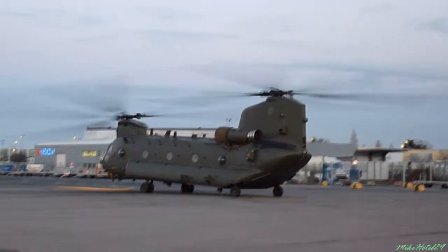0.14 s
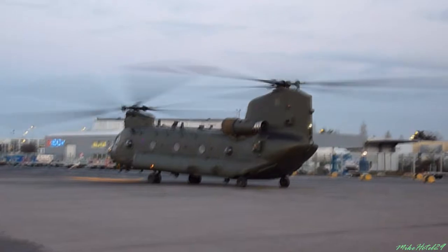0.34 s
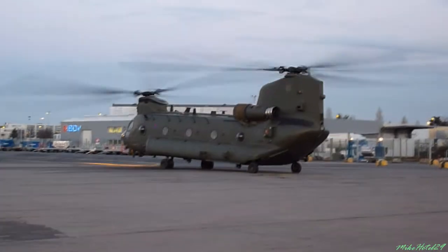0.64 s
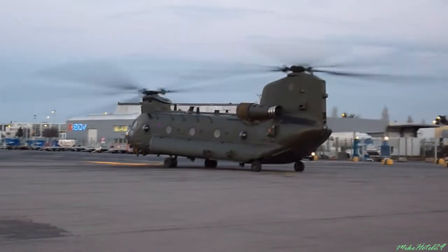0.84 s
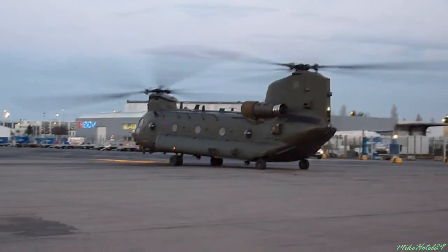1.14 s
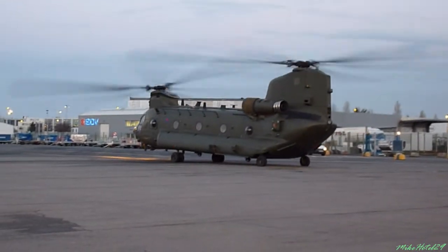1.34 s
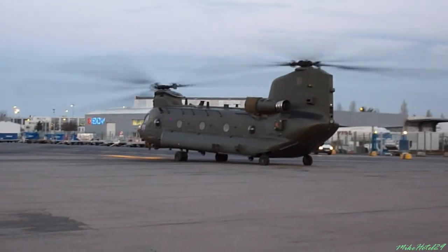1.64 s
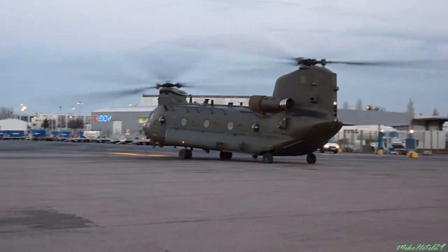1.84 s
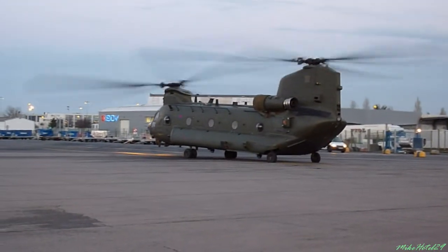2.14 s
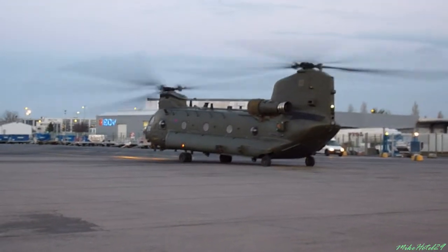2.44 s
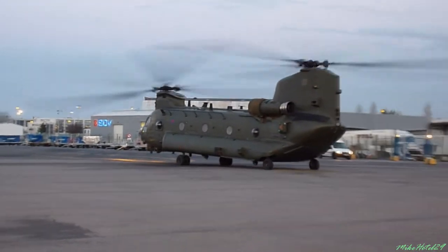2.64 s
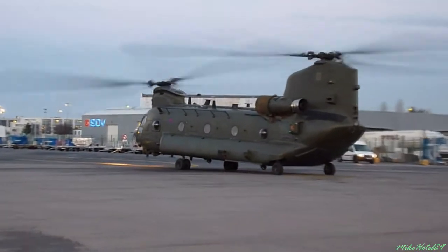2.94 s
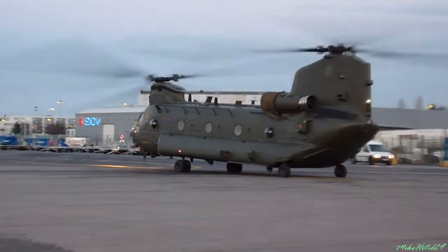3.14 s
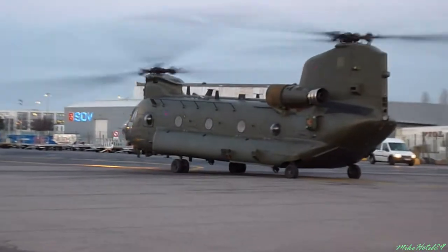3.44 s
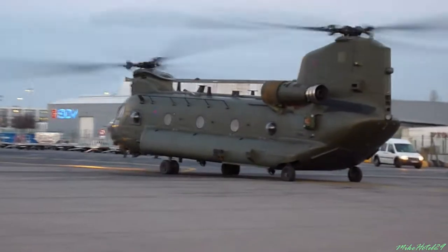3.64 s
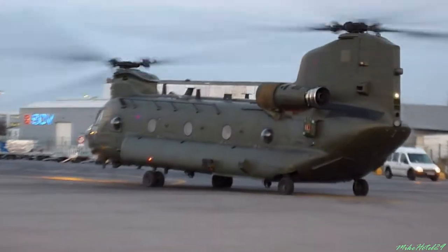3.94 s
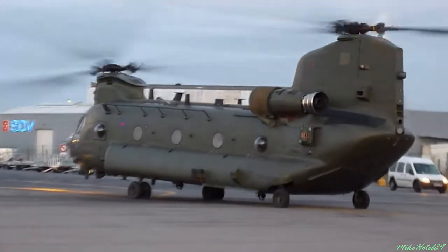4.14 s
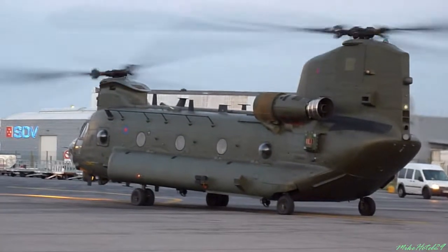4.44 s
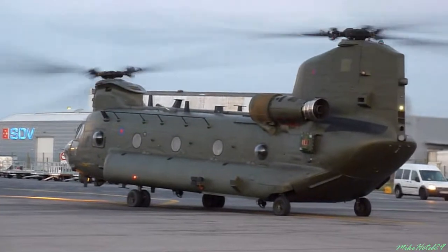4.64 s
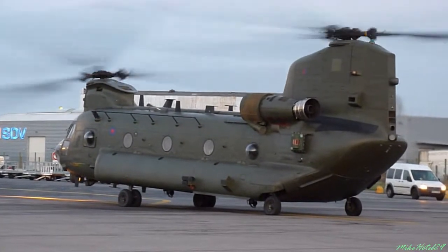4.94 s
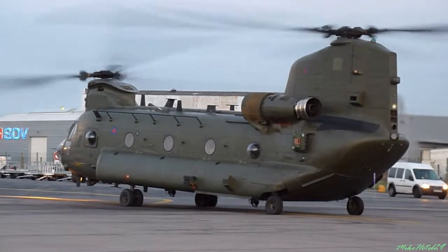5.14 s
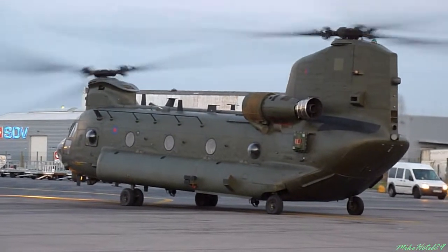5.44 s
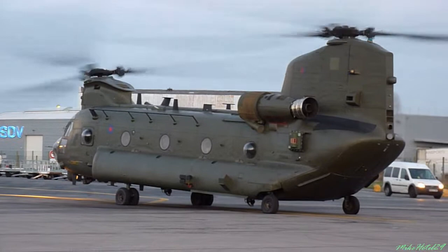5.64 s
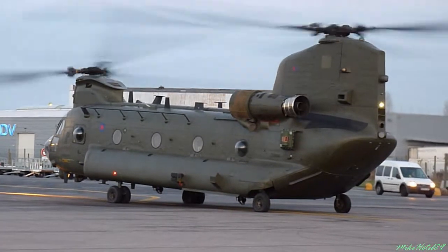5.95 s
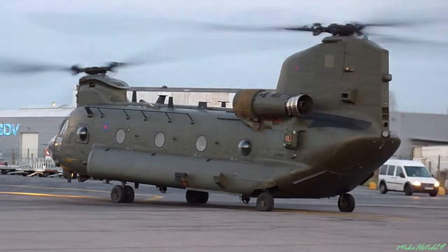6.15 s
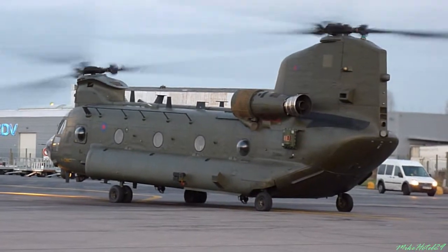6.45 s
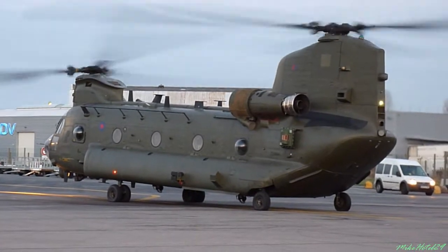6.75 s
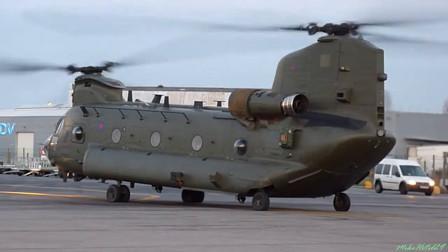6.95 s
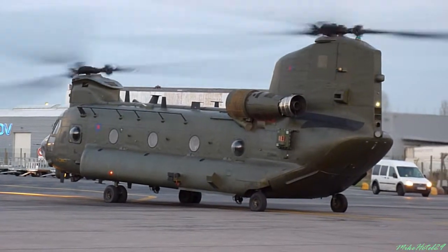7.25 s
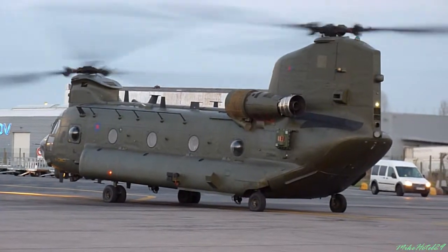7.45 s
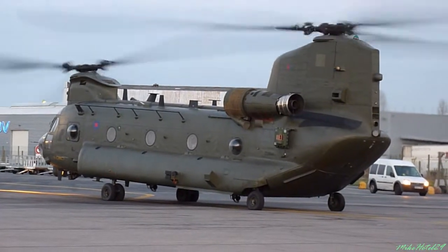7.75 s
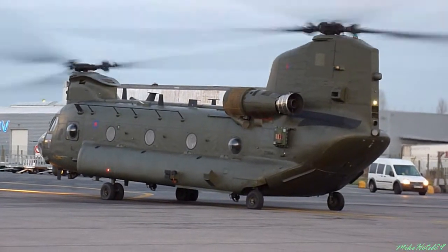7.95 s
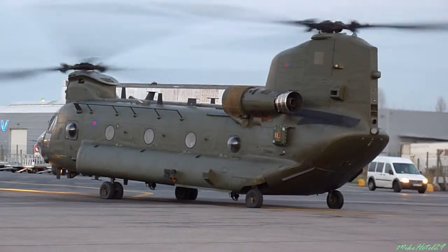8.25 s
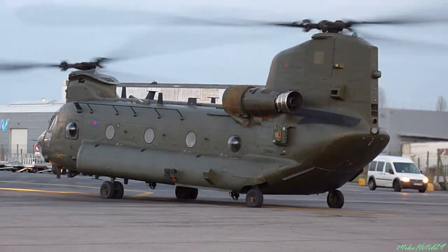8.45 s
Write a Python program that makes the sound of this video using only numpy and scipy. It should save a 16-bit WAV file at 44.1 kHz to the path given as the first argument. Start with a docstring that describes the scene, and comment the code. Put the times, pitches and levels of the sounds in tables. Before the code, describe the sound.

Continuous close helicopter noise outdoors on concrete: rapid interleaved rotor thuds, a short bright swish from the rear blades and a broader, duller beat from the front. Turbines roar beneath, with fluttering hiss and a thin steady whine above. Irregular knocks and chopping bursts roughen the rhythm, densest past the middle of the first half. A low hum dips twice, then peaks near seven seconds. Small camera microphone, narrow band, levels automatically evened.

```python
"""A twin-rotor helicopter taxis across a concrete apron, some tens of metres from a small narrow-band camera.
From the start two rotors pass in turn, eleven blades a second each: deep harmonics, pulses and gated noise.
Turbines roar, hiss and whine as noise and wavering tones; gearboxes sing faintly. Slaps, bursts of torn air,
come early and crowd together from 4 to 4.8 s, among dull chops and ringing knocks. Near 1.5 and 5.8 s the
drone of the fifth harmonic sinks away; it is strongest at 7 s, and a last run of slaps comes after 8.2 s."""
import sys
import numpy as np
from scipy import signal
from scipy.fft import rfft, irfft, next_fast_len
from scipy.io import wavfile
from scipy.ndimage import uniform_filter1d

SR = 44100
rng = np.random.default_rng(int(sys.argv[2]) if len(sys.argv) > 2 else 0)


def master_out(mix):
    """Clip the mix to full scale and print it as 16-bit PCM to the path in sys.argv[1]."""
    frames = np.transpose(np.atleast_2d(mix))
    ceiling = np.clip(frames, -1, 1)
    pcm = np.round(ceiling * 32767).astype(np.int16)
    wavfile.write(sys.argv[1], SR, pcm)


N = 379260
TIME = np.arange(N) / SR
FIRST_PASS_S, PASS_S = .0497, .0889   # first rear blade pass; time from one pass to the next

# noise spectrum of the blades' thump: [f/Hz, relative level/dB]
THUMP_SPECTRUM = [(60, -28), (85, -21), (110, -18.5), (140, 4.5), (190, 1), (245, -2.5), (290, -22),
                  (450, -22.5)]
# noise spectrum of the chop from large eddies: [f/Hz, relative level/dB]
CHOP_SPECTRUM = [(200, -23), (320, 5.5), (450, -6.5), (750, 0), (1000, -17.5), (1700, -20.5)]
# noise spectrum of the swish from small eddies: [f/Hz, relative level/dB]
SWISH_SPECTRUM = [(600, -19.5), (1050, 5), (1500, 6.5), (1900, -1.5), (3000, 0), (4000, -6.5), (5000, -13),
                  (7000, -11), (8000, -19)]
# each sound comes from its own part of the blade's sweep, which shifts as the aircraft turns:
# [t/s, rear thump lateness/passes, rear swish lateness/passes, front swish lateness/passes]
BLADE_LATENESS = [(0, 0.084, 0.057, .03), (.6, 0.04, .02, 0.032), (2, 0.0079, 0.016, -0.012),
                  (3.1, -0.018, -.035, -0.02), (3.7, -0.015, 0.036, 0.008), (4.4, -0.019, 0.0037, 0.00086),
                  (4.8, -0.022, -.02, -0.07), (5.6, -0.048, -0.0012, -0.02), (7.1, -0.047, 0.02, -0.072),
                  (8.6, -0.076, -0.07, -.03)]


def from_db(db):
    """Decibels to gain."""
    return 10 ** (np.asarray(db) / 20)


def rms_one(x):
    """Scale to unit power."""
    return x / np.sqrt(np.mean(np.abs(x) ** 2) + 1e-20)


def in_time(rows):
    """The columns of a curve table at every sample."""
    s, *columns = np.transpose(rows)
    return [np.interp(TIME, s, column) for column in columns]


def at_hz(points, hz):
    """Gain of a spectrum table, joined on a log-frequency axis."""
    f, db = np.transpose(points)
    return from_db(np.interp(np.log(hz), np.log(f), db))


def band_pass(x, low_hz, high_hz):
    """Keep one band with gentle skirts."""
    return signal.sosfilt(signal.butter(2, [low_hz, high_hz], "band", fs=SR, output="sos"), x)


def boost(x, hz, width_hz, gain):
    """A resonance brings the band round hz to the given gain and leaves the rest alone."""
    return x + (gain - 1) * signal.lfilter(*signal.iirpeak(hz, hz / width_hz, fs=SR), x)


def drift(rate_hz):
    """Smooth random wander with spread 1: noise through two equal low-pass poles, made every 40 samples."""
    step = 40
    pole = np.exp(-2 * np.pi * rate_hz * step / SR)
    settling = 2000
    noise = rng.standard_normal(N // step + settling + 2)
    slow = signal.lfilter([1], [1, -2 * pole, pole * pole], noise)[settling:]
    return np.interp(np.arange(N) / step, np.arange(len(slow)), rms_one(slow))


def wavering_tone(hz, spread_hz):
    """A tone scattered by moving air into a narrow band; rms 1."""
    turn = 2 * np.pi * np.cumsum(hz * np.ones(N)) / SR
    return drift(spread_hz) * np.cos(turn) + drift(spread_hz) * np.sin(turn)


def turbulence(spectrum, memory=0, memory_hz=300):
    """Stereo noise, rms 1; large eddies outlive a blade pass, so lows partly repeat where memory is set."""
    # stereo width: [f/Hz, side against mid/dB]
    stereo_width = [(50, -23.5), (140, -32), (250, -28.5), (500, -27.5), (1000, -22), (2000, -11.5),
                    (4000, -9), (7000, -2.5)]
    size = next_fast_len(N)
    hz = np.maximum(np.arange(size // 2 + 1) * SR / size, 1)
    lowest_hz, highest_hz = spectrum[0][0], spectrum[-1][0]
    skirts = 1 / (1 + (hz / (2 * highest_hz)) ** 4) / (1 + (lowest_hz / (2 * hz)) ** 4)
    kept = np.clip(memory, 0, .9) / (1 + (hz / memory_hz) ** 4)
    repeats = np.sqrt(1 - kept ** 2) / (1 - kept * np.exp(-2j * np.pi * hz * PASS_S))
    mid, side = rfft(rng.standard_normal((2, size))) * at_hz(spectrum, hz) * skirts * repeats
    side = side * at_hz(stereo_width, hz)
    return rms_one(irfft(np.array([mid + side, mid - side]), size)[:, :N])


def steady(x):
    """Even out the level over two blade passes; rms near 1."""
    power = uniform_filter1d(np.mean(x ** 2, axis=0), int(2 * PASS_S * SR))
    return x / np.sqrt(power + 1e-12)


def ground_echo(x, delay_s, wander_s, share):
    """The concrete returns a copy whose wandering delay, from blades and wind, recolours each beat."""
    late = TIME - delay_s - wander_s * drift(4.8)
    echo = np.array([np.interp(late, TIME, ear) for ear in x])
    return (x + share * echo) / np.hypot(1, share)


def blade_gate(passes, rise, fall):
    """Swell and decay around each blade pass; rise and fall are shares of one pass."""
    after = passes % 1
    return np.maximum(np.exp(-after / fall), np.exp(-((1 - after) / rise) ** 2))


def blade_pulses(passes, low_hz, high_hz, scatter_db):
    """One short pressure pulse per blade, each of its own strength; peak near 1."""
    clicks = np.diff(np.floor(passes), prepend=np.floor(passes[0]))
    pulses = band_pass(clicks + 1e-18, low_hz, high_hz)
    return pulses / np.abs(pulses).max() * from_db(scatter_db * drift(10.6))


def torn_air(spectrum, level_db, gate, crackle_db):
    """Gated noise: vortices break up unevenly along the blade and crackle, while the beats stay even."""
    uneven = drift(160)
    crackle = from_db(crackle_db * (uneven - uniform_filter1d(uneven, size=SR // 60)))
    return from_db(level_db) * gate * crackle * turbulence(spectrum)


def swell(s, swell_s):
    """The samples that a blow near s covers, and its envelope: a quick swell to a peak just before s and a
    slower decay."""
    age = np.arange(SR // 12) / SR / swell_s   # in swell times; the envelope is 1 at one swell time and peaks a little earlier, at two thirds
    # the envelope sets out from zero one swell time ahead of s
    span = int((s - swell_s) * SR) + np.arange(len(age))
    # at the peak the rise and the decay balance only roughly
    return span, np.sqrt(age) * np.exp(.75 * (1 - age))


def torn_burst(s, db, swell_s, low_hz, high_hz):
    """A few milliseconds of torn air in one band; db is its level near the top of the swell."""
    out, (span, shape) = np.zeros(N), swell(s, swell_s)
    noise = band_pass(rng.standard_normal(2 * len(span)), low_hz, high_hz)
    settled = noise[len(span):]
    out[span] = from_db(db) * rms_one(shape * settled) * np.sqrt(np.mean(shape ** 2))
    return out


def gearboxes():
    """Meshing teeth sing faint tones, each smeared into a narrow band."""
    # gear mesh tones: [f/Hz, spread/Hz, level/dB]
    mesh_tones = [(1447, 11.5, -47), (1784, 3.4, -47)]
    return sum(from_db(db) * wavering_tone(hz, spread) for hz, spread, db in mesh_tones)


def beams():
    """Narrow sounds that leave the aircraft in one direction swell as they sweep past the microphone."""
    # tones and narrow noise as the aircraft turns: [t/s, half length/s, f/Hz, spread/Hz, level/dB]
    beam_table = [(2.1, 0.34, 1785, 5.3, -35), (3.7, 0.67, 436.6, 34, -36), (4.198, 0.54, 247.4, 20, -26.5),
                  (5.4, 0.97, 3800, 170, -37), (4.197, 0.55, 1530, 61, -45), (4.72, 0.14, 5830, 98, -42)]
    out = np.zeros(N)
    for s, length, hz, spread, db in beam_table:
        sweep = np.exp(-((TIME - s) / length) ** 2)
        out += from_db(db) * sweep * wavering_tone(hz, spread)
    return out


def turbines(passes):
    """Exhaust and downwash roar; intake hiss and compressor whine flutter in the air from the blades."""
    # exhaust and downwash spectrum: [f/Hz, relative level/dB]
    roar_spectrum = [(25, -30), (60, -5), (80, -14), (110, -5), (140, 4), (190, -5.5), (245, -3.5),
                     (290, -8.5), (500, -18), (760, -12), (1000, -17.5), (1500, -25), (2200, -27),
                     (5000, -40)]
    # intake spectrum: [f/Hz, relative level/dB]
    hiss_spectrum = [(1000, 1), (2200, 1.5), (3500, 4.5), (4500, -1.5), (5800, -3.5), (6900, -5),
                     (7500, -9.5), (8000, -16.5)]
    # intake hiss ahead of trim and flutter: [t/s, level/dB]
    hiss_level = [(0.0, -30.5), (0.3, -31), (1.5, -31), (1.6, -32), (4.6, -34), (4.7, -31.5), (4.9, -35.5),
                  (5.5, -31), (7.1, -32), (7.3, -30.5), (8.6, -34)]
    # compressor tone ahead of trim and flutter: [t/s, f/Hz, level/dB]
    whine_curve = [(0, 6509, -42), (1.4, 6503, -43), (2.4, 6486, -44), (3.3, 6468, -45), (4.5, 6470, -48),
                   (5.3, 6472, -47), (6, 6474, -44), (7.3, 6480, -45), (8.6, 6465, -44)]
    roar = from_db(-20.5) * steady(turbulence(roar_spectrum, memory=0.63, memory_hz=377))
    flutter = 1.063 + 0.47 * blade_gate(passes - .62, rise=0.14, fall=0.69)

    hiss_gain = from_db(in_time(hiss_level)[0] + 0.7 + 1.23 * drift(2.8))
    hiss = hiss_gain * ground_echo(turbulence(hiss_spectrum), delay_s=0.001408, wander_s=0.00011, share=0.21)

    whine_hz, whine_db = in_time(whine_curve)
    scattered = np.array([wavering_tone(whine_hz, spread_hz=39) for ear in range(2)])
    common = wavering_tone(whine_hz, spread_hz=40)
    whine = from_db(whine_db + 1.0) * rms_one(0.6 * scattered + common)
    to_the_right = from_db([[-.55], [.55]])   # hiss and whine sit a little to the right
    return roar + flutter * (hiss + whine) * to_the_right


def thrum(passes):
    """Low harmonics of the blade rate add up to one throb per pass; the fifth stands out as a drone."""
    # the low throb: [multiple of the blade rate, relative level/dB]
    harmonics = [(1, -18), (2, 4.5), (3, -2), (4, 7), (6, -7)]
    # low throb ahead of trim: [t/s, level/dB]
    throb_level = [(0.0, -30), (3.6, -35), (4.2, -30), (4.8, -40), (5.7, -36), (6.4, -36.5), (8.6, -35.0)]
    # drone at five times the blade rate, ahead of trim: [t/s, level/dB]
    drone_level = [(0.0, -28), (1.1, -29), (1.5, -45), (1.8, -27), (3.1, -27), (4.9, -26), (5.8, -53),
                   (6.3, -36), (7.0, -23), (8.6, -33)]
    lead = 0.16   # in passes: the low pressure wave leads the rear blade's swish
    turn = 2 * np.pi * (passes + lead)
    throb = rms_one(sum(from_db(db + .7 * drift(1.5)) * np.cos(round(k) * turn) for k, db in harmonics))
    throb_gain = from_db(in_time(throb_level)[0] - 1.5)
    drone_gain = from_db(in_time(drone_level)[0] - 3.5)
    return throb_gain * throb + drone_gain * np.cos(5 * turn)


def front_rotor(passes, ordinary):
    """These blades pass in between the rear ones, with a broader, duller beat."""
    # weight of the front thump: [t/s, relative level/dB]
    thump_weight = [(0.0, -2.5), (0.8, -9.5), (1.3, 0), (2.2, -0.5), (3.8, -3.5), (4.5, -2), (5.1, -2),
                    (6.4, -4.5), (6.9, 2.5), (7.7, -6.5), (8.6, -0.5)]
    # roughness of the air at the front blades: [t/s, relative chop level/dB, relative swish level/dB]
    wake_roughness = [(0.0, 0, -5), (0.5, -7.5, -15), (1.2, 0.5, 0.5), (2.0, 3.5, -4.5), (2.6, -1, 2.5),
                      (3.3, 0, 0), (3.5, 0, -9), (4.35, -1, -17), (4.55, -2, 2), (4.8, 3.5, 4.5),
                      (5.05, 0, 0.5), (5.9, -2, -2), (6.4, 2.5, -2), (7.25, -0.5, 1.5), (7.6, -8, -19),
                      (8.6, -6, -8)]
    thump_db = in_time(thump_weight)[0]
    chop_db, swish_db = in_time(wake_roughness)
    *_, swish_late = in_time(BLADE_LATENESS)

    body_noise = turbulence(THUMP_SPECTRUM, memory=0.8, memory_hz=363)
    body = from_db(-20) * steady(blade_gate(passes - .58, rise=0.16, fall=0.42) * body_noise)
    pulse = from_db(-13.5) * blade_pulses(passes - .52, low_hz=125, high_hz=229, scatter_db=2.5)

    chop_gate = blade_gate(passes - .57, rise=0.18, fall=0.4)
    chop = torn_air(CHOP_SPECTRUM, -23.5 + chop_db, chop_gate, crackle_db=2)
    swish_gate = blade_gate(passes - .6 - swish_late, rise=0.082, fall=0.25)
    swish = torn_air(SWISH_SPECTRUM, -27 + swish_db, swish_gate, crackle_db=2.8)
    rough_air = ground_echo(chop + swish, delay_s=0.001798, wander_s=0.000362, share=0.44)
    return ordinary * from_db(thump_db) * (body + pulse) + rough_air


def rear_rotor(passes, ordinary):
    """Blades working in the front rotor's wake: a short thump and a bright swish."""
    # weight of the rear thump: [t/s, relative level/dB]
    thump_weight = [(0.0, -15.5), (0.3, 5.5), (1.2, -6.5), (1.6, -1), (3.3, -9), (3.9, -3), (4.7, -2),
                    (5.0, 3.5), (6.2, 0.5), (7.3, -9.5), (8.0, 4.5), (8.6, -1)]
    # roughness of the air at the rear blades: [t/s, relative chop level/dB, relative swish level/dB]
    wake_roughness = [(0.0, -0.5, -2), (.7, 3.5, -3), (1.25, -0.5, -1), (1.7, -1, -1.5), (2.6, -1, -1.5),
                      (3.2, -2, -0.5), (3.7, -8, -1.5), (4.2, 7.5, 4.5), (4.7, -11, -1.5), (4.95, -15, -7),
                      (5.5, 3.5, -4), (6.1, -2.5, -0.5), (7.1, -1, -2), (7.3, 2.5, 2.5), (7.8, 2.5, -1),
                      (8.6, 1, 1.5)]
    thump_db = in_time(thump_weight)[0]
    chop_db, swish_db = in_time(wake_roughness)
    thump_late, swish_late, _ = in_time(BLADE_LATENESS)

    body_noise = turbulence(THUMP_SPECTRUM, memory=0.47, memory_hz=350)
    body = from_db(-26) * steady(blade_gate(passes - thump_late, rise=0.043, fall=0.2) * body_noise)
    pulse_passes = passes + 0.031 - thump_late
    pulse = -from_db(-16.5) * blade_pulses(pulse_passes, low_hz=121.0, high_hz=214, scatter_db=2.5)

    chop_gate = blade_gate(passes + 0.08, rise=0.11, fall=0.47)
    chop = torn_air(CHOP_SPECTRUM, -28.5 + chop_db, chop_gate, crackle_db=4.5)
    edge = blade_gate(passes - swish_late, rise=0.052, fall=0.076)
    wake = blade_gate(passes - swish_late, rise=0.12, fall=0.29)
    swish = torn_air(SWISH_SPECTRUM, -24 + swish_db, 0.51 * edge + .7 * wake, crackle_db=1.5)
    rough_air = ground_echo(chop + swish, delay_s=.0027, wander_s=0.000293, share=0.59)
    return ordinary * from_db(thump_db) * (body + pulse) + rough_air


def lobes(x):
    """Bands of the rotor and turbine sound swell or sink as the aircraft turns."""
    # bands beamed towards or past the microphone: [t/s, half length/s, f/Hz, width/Hz, change/dB]
    lobe_table = [(0.47, 0.32, 130, 32, 3.5), (.8, 1.0, 510, 70, 3.5), (3.45, 1.2, 416, 120, 3),
                  (5.7, 1.3, 196, 43, 1.5), (7.1, 1.4, 110, 32, -1), (3.8, 0.88, 960, 270, -1.5),
                  (3.5, .8, 96, 21, 6.5), (0.84, 0.51, 249, 50, -3), (.3, .9, 97, 22, -5)]
    for s, length, hz, width, db in lobe_table:
        x = boost(x, hz, width, from_db(db * np.exp(-((TIME - s) / length) ** 2)))
    return x


def chops(spread):
    """A blade tears through a patch of rough air with a dull, full burst, over an octave wide."""
    # chops: [t/s, level/dB, swell/s, centre f/Hz]
    chop_table = [(.76, -19, 0.0033, 785), (.958, -21, .003, 700), (1.335, -22.5, .005, 600),
                  (1.699, -23, 0.0033, 650), (1.874, -18.5, 0.0032, 650), (2.047, -16, 0.0054, 670),
                  (2.136, -17, 0.0013, 630), (2.761, -16.5, .003, 730), (3.21, -22, .004, 600),
                  (3.301, -20, .005, 730), (3.388, -15, 0.0035, 600), (3.571, -30, .005, 550),
                  (3.654, -19.5, .005, 486), (4.134, -13.5, 0.00217, 616), (4.311, -15, 0.0032, 530),
                  (4.812, -24, 0.0068, 570), (6.32, -26, .006, 680), (6.849, -23, 0.0034, 700),
                  (7.12, -19, .003, 535), (7.209, -17, 0.00457, 654)]
    return sum(torn_burst(s, db, swell_s, hz / (1 + spread), hz * (1 + spread))
               for s, db, swell_s, hz in chop_table)


def knocks():
    """Blades meet large eddies and ring for a few cycles; also returns the share of ordinary thump left."""
    # knocks ahead of the low cut: [t/s, level/dB, swell/s, ring f/Hz]
    knock_table = [(.242, -8.5, .005, 177), (.322, -9, .005, 152), (.499, -7.5, .003, 171),
                   (.588, -8.5, .0025, 159), (.677, -8, .0025, 179), (.863, -10, .003, 163),
                   (1.433, -9, .003, 176), (1.564, -6.5, .0025, 184), (2.365, -8, .005, 162),
                   (2.413, -6.5, .005, 176), (2.508, -7.5, .0025, 176), (2.699, -9, .0035, 210),
                   (2.786, -8.5, .0025, 171), (2.859, -7.5, .003, 162), (3.43, -8.5, .0025, 177),
                   (4.82, -8.5, .003, 170), (4.85, -7.5, .0025, 188), (4.939, -7.5, .003, 199),
                   (5.113, -6.5, .0035, 178), (5.204, -7.5, .003, 163), (5.291, -9, .005, 160),
                   (5.381, -7.5, .0025, 179), (5.619, -7.5, .004, 151), (5.823, -6.5, .004, 155),
                   (6.006, -9, .003, 172), (6.077, -8.5, .0025, 165), (6.585, -9, .003, 181),
                   (6.852, -7.5, .003, 189), (6.94, -9.5, .003, 198), (7.031, -8.5, .003, 199),
                   (7.307, -9.5, .004, 159), (7.386, -8.5, .0025, 199), (8.016, -8.5, .0025, 181)]
    out, ordinary = np.zeros(N), np.ones(N)
    for s, db, swell_s, hz in knock_table:
        span, shape = swell(s, swell_s)
        out[span] += from_db(db) * shape * np.cos(2 * np.pi * hz * (TIME[span] - s))
        ordinary[span] *= np.maximum(1 - shape, 0)
    return signal.sosfilt(signal.butter(2, 60, "high", fs=SR, output="sos"), out), ordinary


def slaps(low_hz, dull_hz, level_db):
    """Blades cut tip vortices in bright bursts of their own length; distance takes the snap off them."""
    # slaps ahead of trim and dulling: [t/s, level/dB, swell/s, top f/Hz]
    slap_table = [(.405, -22, 0.0038, 4200), (.495, -20, .004, 4600), (.585, -22, 0.0037, 4300),
                  (.674, -21.5, .003, 4400), (1.213, -25, 0.0036, 3000), (1.263, -22, .003, 4000),
                  (1.298, -23, 0.0033, 3000), (1.335, -23, .001, 3500), (2.275, -19.5, .0015, 3500),
                  (3.029, -24, .0015, 3500), (3.305, -20, .004, 4000), (3.425, -26, 0.0017, 3500),
                  (3.609, -23, 0.0044, 4200), (4.046, -31, 0.0037, 3200), (4.066, -20, 0.0061, 4300),
                  (4.135, -19, .002, 3200), (4.151, -19, 0.0034, 4000), (4.223, -22, .0018, 3300),
                  (4.24, -15, 0.0023, 4800), (4.315, -20.5, 0.00357, 2800), (4.4, -17.5, .0015, 2920),
                  (4.491, -19, 0.00246, 3800), (4.58, -22, .003, 3300), (4.67, -20, 0.00118, 3500),
                  (4.758, -22, 0.0024, 3000), (5.739, -19, 0.0021, 3800), (6.581, -16.5, 0.00071, 3500),
                  (7.21, -22.5, .004, 2200), (7.253, -22, 0.0043, 4000), (7.517, -28, 0.0034, 3600),
                  (7.607, -33, .005, 3300), (8.227, -19, .0025, 4200), (8.318, -23, 0.0029, 4200),
                  (8.407, -19.5, 0.0026, 4200), (8.494, -22, 0.0043, 4000)]
    bursts = sum(torn_burst(s, db + level_db, swell_s, low_hz, top_hz)
                 for s, db, swell_s, top_hz in slap_table)
    return signal.sosfilt(signal.butter(4, dull_hz, fs=SR, output="sos"), bursts)


def scene():
    """Both rotors are geared together, so one blade count drives them and the turbines' flutter."""
    # rotor speed: [t/s, blade passes of one rotor/Hz]
    blade_rate = [(0, 11.265), (3, 11.247), (8.6, 11.24)]
    passes = np.cumsum(in_time(blade_rate)[0]) / SR - FIRST_PASS_S / PASS_S
    knocking, ordinary = knocks()
    rotors = thrum(passes) + front_rotor(passes, ordinary) + rear_rotor(passes, ordinary)
    blows = chops(spread=.5) + knocking + slaps(low_hz=950, dull_hz=5000, level_db=-.9)
    return gearboxes() + beams() + lobes(turbines(passes) + rotors) + blows


def gain_control(x):
    """The camera eases its gain down after heavy beats and up again in the lulls."""
    resting_db, memory_s = -17.5, 0.086
    share = 0.67   # of each level swing in dB, taken back
    keep = np.exp(-1 / (memory_s * SR))
    relative_power = np.mean(x ** 2, axis=0) / from_db(resting_db) ** 2
    power, _ = signal.lfilter([1 - keep], [1, -keep], relative_power, zi=[keep])
    return x / np.sqrt(power) ** share


def record(dry):
    """Ripple, notches and gain control shape the sound; low-rate sampling mirrors a faint copy on top."""
    # ripple from the ground reflection and the camera body: [f/Hz, width/Hz, change/dB]
    ripple = [(214.2, 26.3, -10), (226, 56, 5), (274, 40, -7.5), (366, 26, -9.5), (453, 30, 4.5),
              (473.3, 20, -16), (502.5, 28, 4), (535, 19, -10.5), (678, 32, -2.5), (1109, 40, 4),
              (1280, 73, -3), (1460, 55, 2), (1815, 104, -5.5), (2307, 91, 2.5), (2623, 320, -4),
              (2980, 120, 1.5), (3244, 185, -4.5), (3540, 200, 1.5), (3630, 75, -3)]
    # narrow notches in the camera's sound: [f/Hz, width/Hz]
    notches = [(5430, 360), (7915, 77)]
    camera_rate_hz, smoothing_hz, cutoff_hz = 16000, 7200, 12700
    x = dry
    for hz, width, db in ripple:
        x = boost(x, hz, width, from_db(db))
    for hz, width in notches:
        x = signal.lfilter(*signal.iirnotch(hz, hz / width, fs=SR), x)
    x = gain_control(x)
    x = signal.sosfilt(signal.ellip(16, .2, 70, camera_rate_hz / 2, fs=SR, output="sos"), x)
    x = x * (1 + 2 * np.cos(2 * np.pi * camera_rate_hz * TIME))   # mirror images round the camera's rate
    x = signal.sosfilt(signal.butter(6, smoothing_hz, fs=SR, output="sos"), x)
    return signal.sosfilt(signal.ellip(8, .2, 70, cutoff_hz, fs=SR, output="sos"), x)


dry = scene()
out = record(dry)
master_out(out)
```